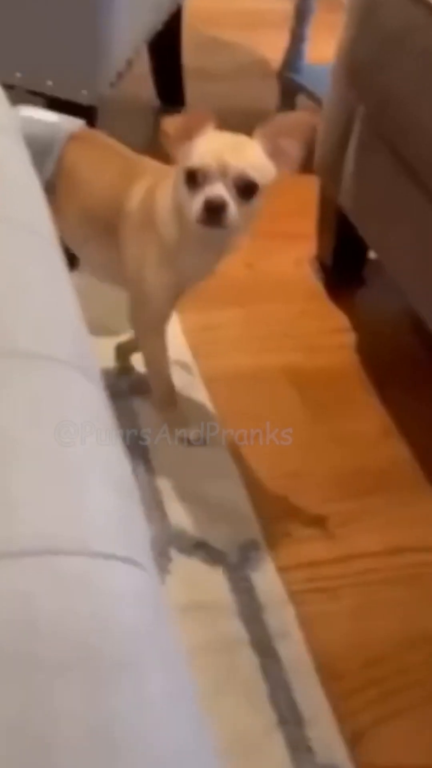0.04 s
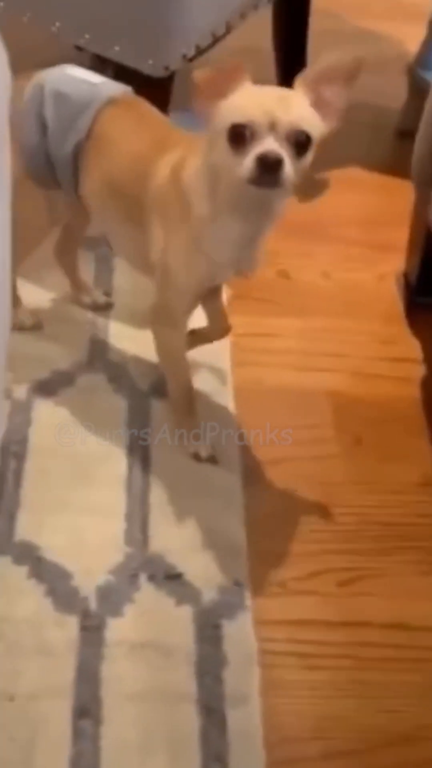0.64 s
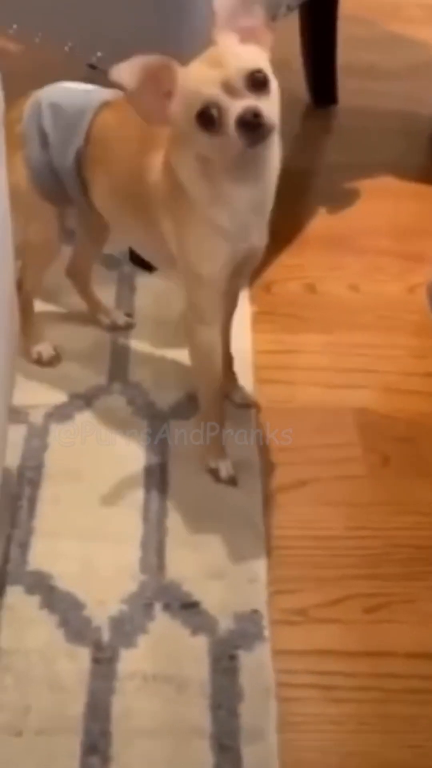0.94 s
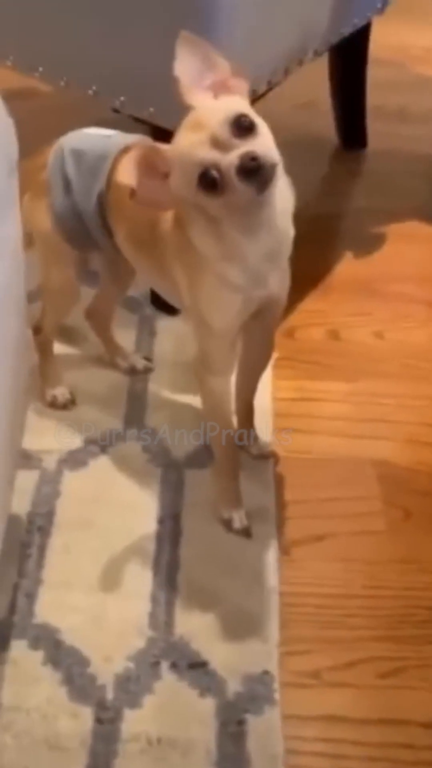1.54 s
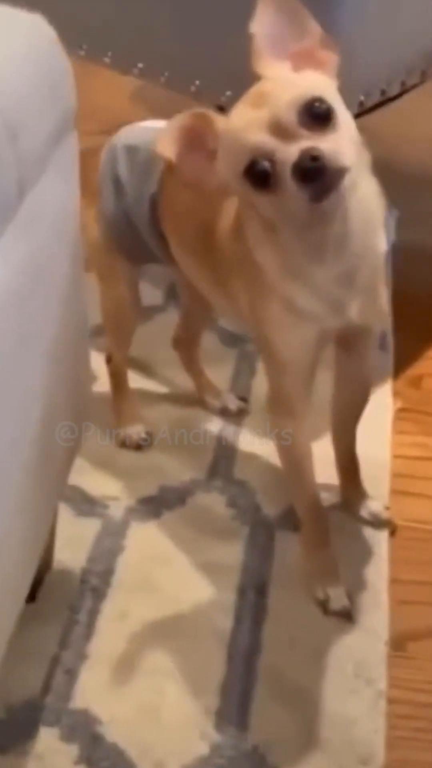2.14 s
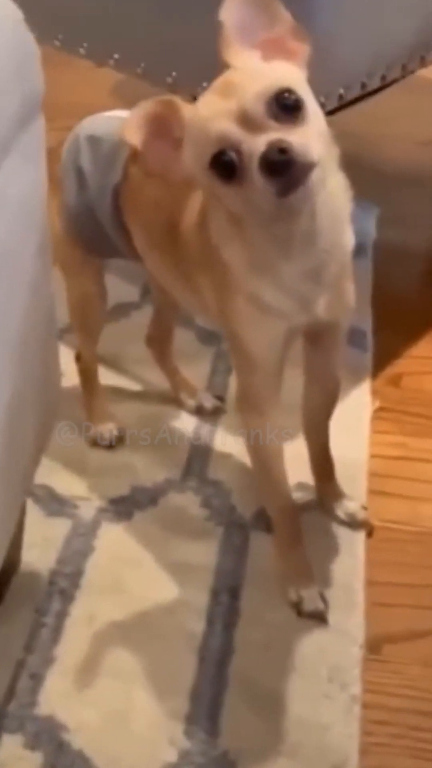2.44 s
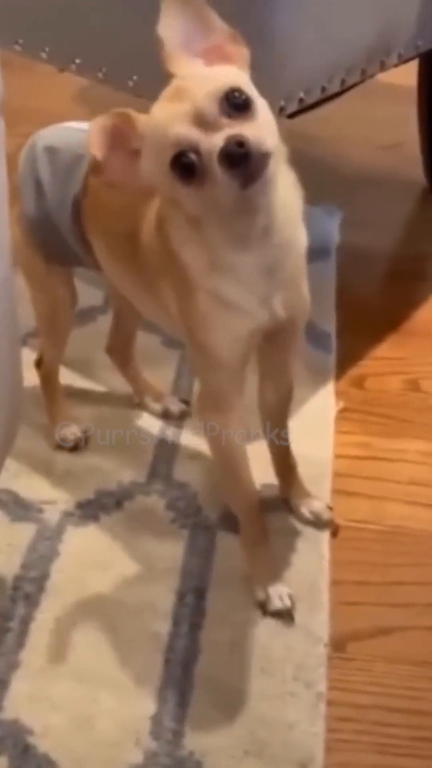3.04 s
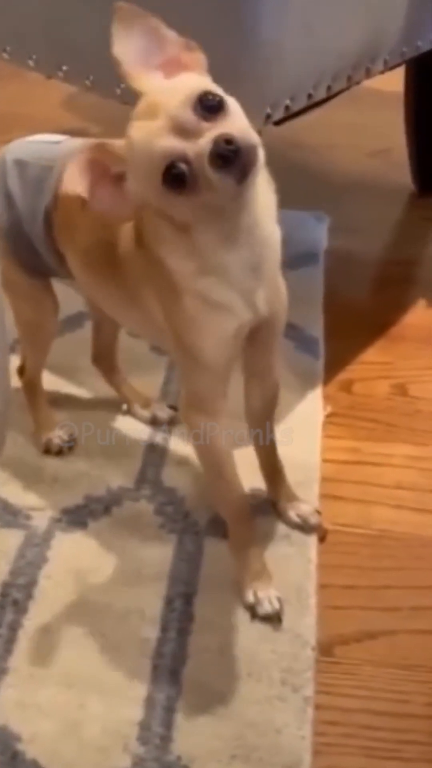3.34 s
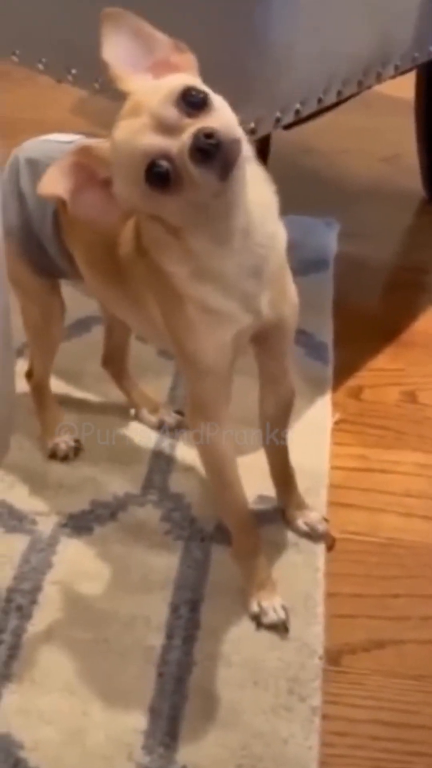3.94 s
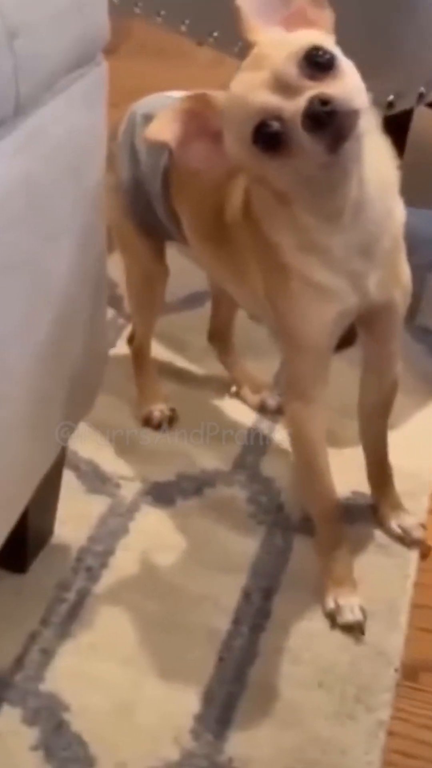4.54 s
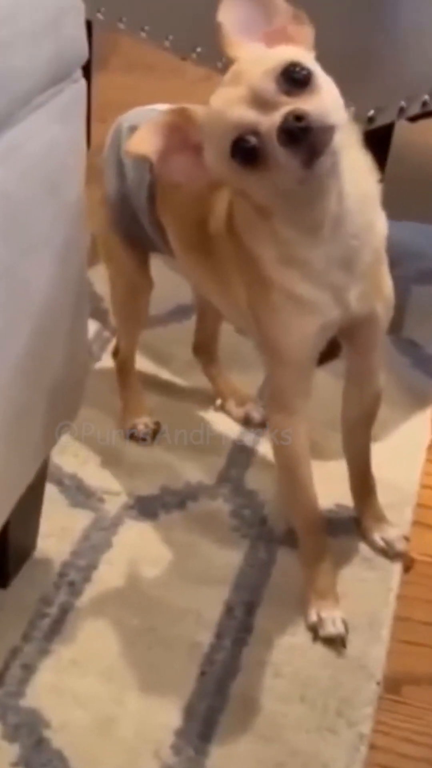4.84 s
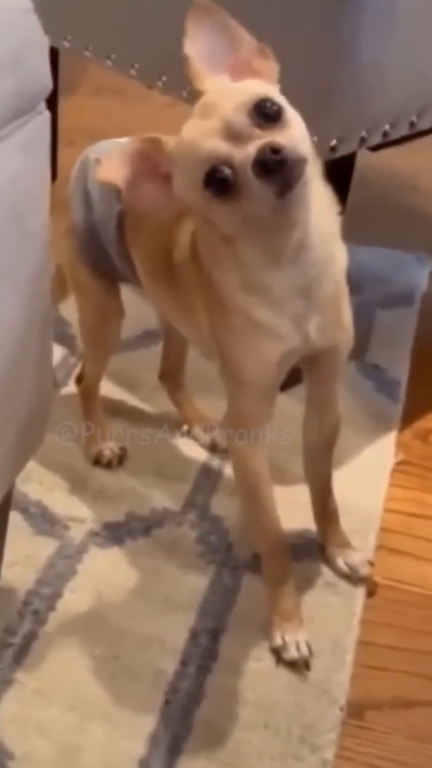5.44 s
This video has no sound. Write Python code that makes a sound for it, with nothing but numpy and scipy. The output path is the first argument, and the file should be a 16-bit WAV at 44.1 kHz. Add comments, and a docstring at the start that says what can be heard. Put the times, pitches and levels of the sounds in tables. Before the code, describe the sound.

A rubber squeaky toy is squeezed three times up close, each giving a pair of short high squeaks in a humming room.

```python
"""A furnished living room, with a handheld phone close to a rubber toy that is squeezed three times.
Its reed gives a bright, rough squeak as the air is pushed out and a lower, purer one as the rubber
refills; floor and furniture throw both back. At the start there is a faint short whine, some handling
noise and a brief dip in level. An appliance hum and a low rumble fill the room."""
import sys
import numpy as np
from scipy import signal
from scipy.fft import rfft, irfft
from scipy.io import wavfile

SR = 44100
rng = np.random.default_rng(int(sys.argv[2]) if len(sys.argv) > 2 else 0)


def dump_mix(stems):
    """Bounce the given channels to the path in sys.argv[1] as a 16-bit WAV at rate SR."""
    frames = np.atleast_2d(stems).T  # one column per channel
    limited = np.clip(frames, -1, 1)  # hard clip at full scale
    pcm = np.round(limited * 32767).astype(np.int16)
    wavfile.write(sys.argv[1], SR, pcm)


N = 250560
TIME = np.arange(N) / SR

# The faint whine. Each row: time in seconds, pitch in Hz, level in dB.
WHINE_PATH = [(0, 880, -41), (0.012, 830, -34.5), (.03, 836, -48), (0.046, 847, -40), (.065, 830, -60)]
# Handling rustle: rubbing at the start, then a hand gripping the rubber toy just before the first
# squeeze. Each row: time in seconds, level in dB.
RUSTLE_LEVEL = [(0, -42), (.07, -49), (.14, -43), (.22, -52), (.26, -61), (.48, -75), (.67, -60),
                (.72, -130)]
# Its spectrum. Each row: frequency in Hz, relative level in dB.
RUSTLE_SPECTRUM = [(100, -4.5), (400, 0), (1000, 4), (2000, -1.5), (3200, -7), (6200, -12.5), (8000, -20.5),
                   (13000, -21), (15000, -47)]
# Handling clicks. Each row: start in seconds, level in dB, centre in Hz, half-width in octaves,
# decay in seconds.
CLICKS = [(.0975, -31.5, 5400, 0.3, .0016), (.0995, -33.5, 4400, 0.3, 0.002),
          (.098, -38, 1900, 2.55, 0.007), (.138, -39.5, 1100, 4.4, 0.003), (.1465, -44.5, 5800, 0.58, 0.01)]
# Room rumble. Each row: frequency in Hz, relative level in dB.
RUMBLE_SPECTRUM = [(15, -35), (30, -24), (45, -13.5), (66, -2.5), (100, -8.5), (170, -15), (230, -14.5),
                   (320, -25), (400, -22.5), (620, -36.5), (900, -45), (1600, -51.5), (6000, -57),
                   (11000, -69), (15000, -79)]
# Appliance hum. Each row: frequency in Hz, level in dB.
HUM_LINES = [(59.5, -52), (74, -56.5), (147, -69.5), (198, -63.5), (221, -67.5), (394, -72), (420, -75)]
# Rumble and hum slowly ease. Each row: time in seconds, gain in dB.
BACKGROUND_GAIN = [(0, 1), (1, 0.25), (2.6, 0), (4, -1.06), (5, -1.5), (5.68, -2)]
# Everything dips briefly. Each row: time in seconds, gain in dB.
LEVEL_DIP = [(.227, -10), (.231, -26), (.248, -30), (.252, -5)]
# Air rushing through the reed slit. Each row: frequency in Hz, relative level in dB.
SLIT_SPECTRUM = [(400, -39.5), (650, -15), (900, -29), (1300, -13.5), (1800, -9.5), (2500, -5.5),
                 (3000, -13.5), (3700, -15), (5800, -6), (6700, -9), (7450, -26.5), (8200, -19),
                 (10500, -25.5), (12200, -25), (13500, -57)]
# Air pushed out. Each row: start, wait, rise, collapse time and length in seconds, opening and top
# pitch in Hz, then level, fundamental lift, overtone lift and whistle lift in dB.
SQUEEZE_STROKES = [(0.6868, .0055, 0.0057, 0.019, .060, 1195, 1304, -13, -3, -1, 0.5),
                   (2.868, 0.013, .015, 0.059, .100, 1179, 1362, -15, -1, 0, 2.5),
                   (5.191, 0.01, 0.016, .062, .090, 1159, 1293, -15.5, -5.5, -0.5, 2.5)]
# Air drawn back in. Each row: start, rise and fall in seconds, opening, top and end pitch in Hz, level,
# fundamental lift and its early cut in dB, cut length in seconds, octave ring in dB, ring length in
# seconds, whistle lift in dB.
REFILL_STROKES = [(0.921, .030, .105, 1103, 1194, 939, -19.5, 8, -0.8, 0.032, 9, .049, 16.5),
                  (3.146, 0.038, .098, 1102, 1168, 957, -22, 8, -5.5, 0.055, 12.5, 0.055, 9),
                  (5.427, .030, .107, 1067, 1164, 976, -22.5, 7, -24, 0.061, 4.5, 0.093, 13.5)]
# The squeaker's colour, blowing out and drawing in. Each row: frequency in Hz, gain in dB.
SQUEEZE_RESPONSE = [(1200, -9), (2500, -0.5), (3750, -4), (5100, 0), (6400, -1), (6900, -10.5), (7450, -26),
                    (8100, -15.5), (9200, -19), (10600, -18.5), (11800, -27), (13500, -69)]
REFILL_RESPONSE = [(1100, -13.5), (2300, -3), (3400, -8), (4400, -11.5), (4750, -9), (5700, -12.5),
                   (6400, -41.5), (7300, -40), (7850, -24), (8350, -33.5), (9000, -18.5), (10300, -21.5),
                   (11800, -45.5), (14000, -46)]
# Nearby floor and furniture. Each row: delay in seconds, relative left gain, relative right gain.
NEAR_REFLECTIONS = [(.0031, 0.16, 0.024), (.0068, -0.099, -0.23), (.0093, .13, 0.05), (0.0128, 0.17, .1),
                    (0.015, .05, 0.13), (0.02, .12, -.04), (0.0231, -0.12, -0.02), (.031, 0.026, 0.28)]
# Room decay. Each row: frequency in Hz, base time to fall 60 dB in seconds.
ROOM_DECAY = [(300, 0.95), (1100, 0.29), (2400, 0.32), (5000, 0.3), (8000, 0.36), (13000, 0.24)]
# Colour of what the room returns to the microphone. Each row: frequency in Hz, relative gain in dB.
ECHO_SPECTRUM = [(1200, 3.5), (6500, -4), (8500, 3), (11000, 2), (13000, -2.5)]
# The squeaks lean a little to either side. Each row: time in seconds, left minus right in dB.
TOY_LEAN = [(1, 0), (2.9, -1.5), (3.2, 2.5), (5.23, 0.9), (5.5, -0.5)]
# Stereo width, narrow at first. Each row: time in seconds, share of the side signal.
STEREO_WIDTH = [(0, 0.11), (.8, 0.84), (.95, 0.98), (2.8, 0.61)]


def gain_of(db):
    """Decibels to amplitude."""
    return 10 ** (np.asarray(db) / 20)


def unit_rms(x):
    """Scales to rms 1."""
    return x / np.sqrt(np.mean(x ** 2) + 1e-20)


def at_hz(points, hz):
    """Reads a curve on a log-frequency axis."""
    f, value = np.transpose(points)
    return np.interp(np.log(hz + 1), np.log(f + 1), value)


def fader(curve):
    """Gain over the whole scene from rows of seconds and dB."""
    return gain_of(np.interp(TIME, *np.transpose(curve)))


def add(mix, start_s, sound):
    """Mixes a sound in at the given time."""
    part = mix[max(round(start_s * SR), 0):][:len(sound)]
    part += sound[:len(part)]


def noise(spectrum):
    """Noise of rms 1 with the given spectrum."""
    hz = np.fft.rfftfreq(N, 1 / SR)
    return unit_rms(irfft(rfft(rng.standard_normal(N)) * gain_of(at_hz(spectrum, hz)), N))


def wander(rate_hz):
    """Random drift of rms 1, mostly slower than the rate."""
    hz = np.fft.rfftfreq(N, 1 / SR)
    return unit_rms(irfft(rfft(rng.standard_normal(N)) * np.exp(-(hz / rate_hz) ** 2), N))


def whine():
    """A thin, faint tone with its octave."""
    times, hz, db = np.transpose(WHINE_PATH)
    phase = 2 * np.pi * np.cumsum(np.interp(TIME, times, hz)) / SR
    tone = np.sin(phase) + gain_of(-3.5) * np.sin(2 * phase)
    return gain_of(np.interp(TIME, times, db)) * (TIME < times[-1]) * tone


def background():
    """Room tone: rumble and wavering appliance hum in the centre, faint diffuse noise at the sides."""
    hum = np.zeros(N)
    for hz, db in HUM_LINES:
        cycles = np.cumsum(hz + 0.6 * wander(2)) / SR + rng.random()
        hum += gain_of(db) * np.sqrt(2) * np.sin(2 * np.pi * cycles)
    diffuse = gain_of(-71) * noise([(60, -27.5), (180, -21.5), (300, -10.5), (480, -3.5),
                                    (800, -18.5), (5000, -35), (12000, -51.5)])
    rumble = gain_of(-49.5) * noise(RUMBLE_SPECTRUM)
    return fader(BACKGROUND_GAIN) * (rumble + hum) + np.array([diffuse, -diffuse])


def handling():
    """Close handling rustle: rubbing with a few clicks and one bump, then a hand gripping the toy."""
    grain = gain_of(1.5 * wander(60))
    out = fader(RUSTLE_LEVEL) * noise(RUSTLE_SPECTRUM) * grain
    t, hz = np.arange(4096) / SR, np.fft.rfftfreq(4096, 1 / SR)
    for start, db, centre_hz, octaves, decay_s in CLICKS:
        band = 1 / (1 + (np.log2((hz + 1) / centre_hz) / octaves) ** 8)
        burst = unit_rms(irfft(rfft(rng.standard_normal(len(t))) * band))
        add(out, start, gain_of(db) * burst * np.exp(-t / decay_s))
    add(out, 0.139, gain_of(-29.5) * bump(top_hz=1130, sag_s=0.00072, decay_s=0.025))
    return out


def bump(top_hz, sag_s, decay_s):
    """A dull bump whose pitch drops as it dies."""
    t = np.arange(SR // 10) / SR
    pitch = top_hz / (1 + t / sag_s)
    return np.sin(2 * np.pi * np.cumsum(pitch) / SR) * np.exp(-t / decay_s)


def air_puff(peak_s=0.006):
    """A puff of air passes the slit before the reed locks into its tone."""
    age = np.arange(SR // 20) / SR / peak_s
    return noise(SLIT_SPECTRUM)[:len(age)] * (age * np.exp(1 - age)) ** 2


def reed(pitch, lifts_db, response, jitter, rasp, fray, flutter_db, air_db, flutter_hz):
    """Air drives the reed: gliding harmonics, shaken by turbulence, with hiss from the slit."""
    size, blur_limit_rad = len(pitch), 2.6
    # as the pressure sags below its peak the reed loses its grip and the tone frays
    roughness = rasp + fray * (1 - pitch / np.maximum.accumulate(pitch))
    cycles = np.cumsum(pitch * (1 + jitter * wander(flutter_hz)[:size])) / SR
    flutter, smear = wander(flutter_hz), wander(flutter_hz)
    tone = np.zeros(size)
    for k, lift_db in enumerate(lifts_db, 1):
        stretch = slice(k * size, (k + 1) * size)  # each harmonic has its own drift
        gain = gain_of(at_hz(response, k * pitch) + lift_db + flutter_db * flutter[stretch])
        # uneven closing of the reed blurs the high harmonics far more than the low ones
        blur = blur_limit_rad * np.tanh(roughness * k ** 1.8 / blur_limit_rad) * smear[stretch]
        tone += gain * np.cos(2 * np.pi * (k * cycles + rng.random()) + blur)
    # the slit lets a puff of air through once a cycle
    hiss = gain_of(air_db) * noise(SLIT_SPECTRUM)[:size] * (1 + np.cos(2 * np.pi * cycles) / 2)
    return tone + hiss


def reed_envelope(t, attack_s, release_s):
    """The reed starts to speak, holds and dies away."""
    attack = np.sin(np.pi / 2 * np.clip(t / attack_s, 0, 1)) ** 2
    release = np.sin(np.pi / 2 * np.clip((t[-1] - t) / release_s, 0, 1))
    return attack * release


def squeeze(wait_s, rise_s, collapse_s, length_s, open_hz, top_hz,
            db, fundamental_db, overtone_db, whistle_db):
    """Pressure builds, holds and collapses; pitch and loudness follow it."""
    tube_hz, tube_width_hz, db_per_semitone = 5000, 330, 3.4
    t = np.arange(0, length_s, 1 / SR)
    built = 1 - np.exp(-(np.maximum(t - wait_s, 0) / rise_s) ** 1.4)
    spent = 1 - np.exp(-(np.maximum(t - collapse_s, 0) / 0.013) ** 1.5)
    pitch = (open_hz + (top_hz - open_hz) * built) * (1 - 0.17 * spent)
    semitones = 12 * np.log2(pitch / top_hz)
    # the fourth harmonic whistles as it crosses the resonance of the squeaker's tube
    whistling = np.exp(-((4 * pitch - tube_hz) / tube_width_hz) ** 2)
    # under full pressure the second and fourth harmonics stand out from the other overtones
    others_db = overtone_db + 1.9 * (1 - built) + 2.3 * spent - 0.9
    lifts_db = [fundamental_db, 0, others_db, whistle_db * whistling] + [others_db] * 9
    tone = reed(pitch, lifts_db, SQUEEZE_RESPONSE, jitter=0.0025, rasp=0.042, fray=1.5,
                flutter_db=2, air_db=-25.5, flutter_hz=220)
    gain = gain_of(db - 0.5 * spent + db_per_semitone * semitones)
    return tone * gain * reed_envelope(t, attack_s=0.005, release_s=0.016)


def echoes(t60_scale, onset_s, width):
    """Sparse random echoes, each band dying at its own speed, as a stereo pair."""
    t = np.arange(SR * 3 // 4) / SR
    taps = rng.standard_normal((2, len(t))) * (rng.random((2, len(t))) < 0.15)
    taps *= np.clip(t / onset_s - 0.2, 0, 1)
    hz, times, bands = signal.stft(taps, SR, nperseg=256)
    fall_db = -60 * times / (t60_scale * at_hz(ROOM_DECAY, hz)[:, None])
    bands *= gain_of(fall_db + at_hz(ECHO_SPECTRUM, hz)[:, None])
    mid, side = signal.istft(bands, SR, nperseg=256)[1]
    mid, side = mid / np.linalg.norm(mid), width * side / np.linalg.norm(side)
    return np.array([mid + side, mid - side])


def room(sound, near_db, scatter_db, tail_db):
    """At the microphone: direct sound, near reflections, scatter off the furniture, a longer tail."""
    response = gain_of(scatter_db) * echoes(t60_scale=0.96, onset_s=0.012, width=1)
    response += gain_of(tail_db) * echoes(t60_scale=1.407, onset_s=0.0078, width=0.74)
    response[:, 0] += 1
    for delay_s, left, right in NEAR_REFLECTIONS:
        response[:, round(delay_s * SR)] += gain_of(near_db) * np.array([left, right])
    return signal.fftconvolve(sound[None], response, axes=1)[:, :N]


def until(t, end_s, fade_s=0.007):
    """Fades smoothly from 1 to 0 around the given time."""
    return (1 - np.tanh((t - end_s) / fade_s)) / 2


def refill(rise_s, fall_s, open_hz, top_hz, end_hz,
           db, fundamental_db, cut_db, cut_s, ring_db, ring_s, whistle_db):
    """Suction peaks early and ebbs: the octave rings first, the fourth harmonic whistles at the peak."""
    whistle_lead_s, whistle_width_s, db_per_semitone = 0.0042, 0.014, 2.5
    t = np.arange(0, rise_s + fall_s, 1 / SR)
    climb_left = np.maximum(1 - t / rise_s, 0) ** 2
    # the pitch sags faster and faster as the rubber regains its shape
    sag = (np.maximum(t - rise_s, 0) / fall_s) ** 1.5
    pitch = top_hz - (top_hz - open_hz) * climb_left - (top_hz - end_hz) * sag
    semitones = 12 * np.log2(pitch / top_hz)  # negative below the top
    low_db = fundamental_db + cut_db * until(t, cut_s) - 0.2 * semitones  # the fundamental comes late
    edge_db = 1.5 - 0.55 * semitones  # the top overtones outlast the rest
    ringing = (1 - np.exp(-t / 0.0098)) * until(t, ring_s)
    whistling = np.exp(-((t - rise_s + whistle_lead_s) / whistle_width_s) ** 2)
    lifts_db = [low_db, ring_db * ringing, 0, whistle_db * whistling] + [edge_db] * 9
    tone = reed(pitch, lifts_db, REFILL_RESPONSE, jitter=0.0015, rasp=0.024, fray=1.6,
                flutter_db=0.4, air_db=-35, flutter_hz=131)
    gain = gain_of(db + db_per_semitone * semitones)
    return tone * gain * reed_envelope(t, attack_s=0.0029, release_s=0.026)


def rubber_toy():
    """Close to the microphone: each squeeze is rough and forced, each refill gentler and cleaner."""
    pushed, drawn = np.zeros((2, N))
    for start, *stroke in SQUEEZE_STROKES:
        add(pushed, start, squeeze(*stroke))
        add(pushed, start, gain_of(-31) * air_puff())
        add(pushed, start - 0.012, gain_of(-50) * air_puff())  # air leaks before the reed speaks
    for start, *stroke in REFILL_STROKES:
        add(drawn, start, refill(*stroke))
        add(drawn, start, gain_of(-42) * air_puff())
    squeaks = room(pushed, near_db=-2.5, scatter_db=-8.5, tail_db=-13)
    squeaks += room(drawn, near_db=-6, scatter_db=-9.5, tail_db=-17)
    lean = np.sqrt(fader(TOY_LEAN))
    return squeaks * np.array([lean, 1 / lean])


def scene():
    """The toy up close, the whine and the handling noise, over the room tone."""
    return rubber_toy() + whine() + handling() + background()


def record(dry):
    """The phone: a stereo image that starts narrow, a brief dip in level, the top treble cut off."""
    mid = dry.mean(0)
    image = mid + (dry - mid) * np.interp(TIME, *np.transpose(STEREO_WIDTH))
    lowpass = signal.firwin(511, cutoff=14500, window=("kaiser", 9), fs=SR)
    return signal.oaconvolve(image * fader(LEVEL_DIP), lowpass[None], "same")


dry = scene()
out = record(dry)
dump_mix(out)
```